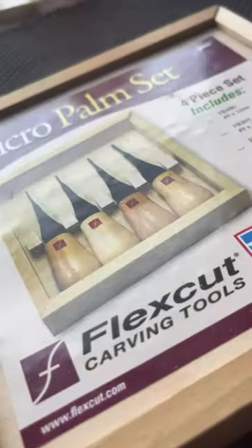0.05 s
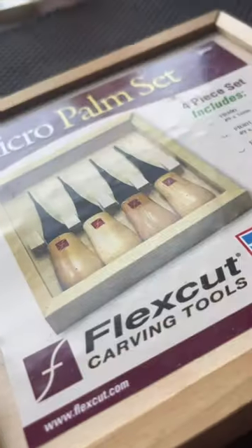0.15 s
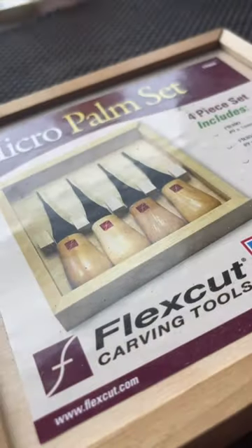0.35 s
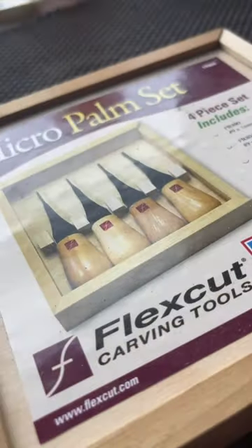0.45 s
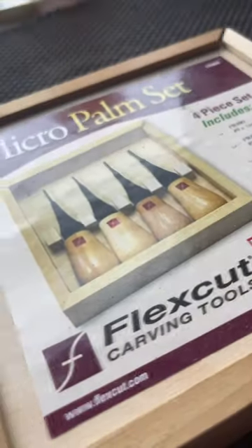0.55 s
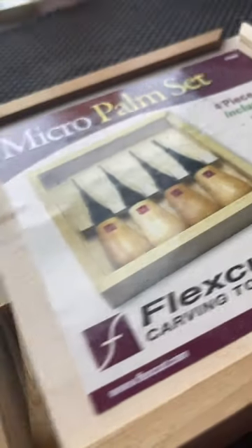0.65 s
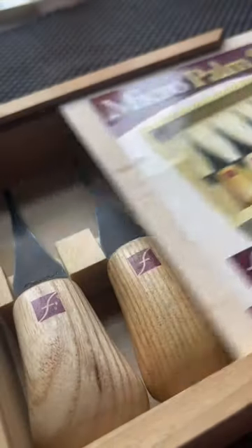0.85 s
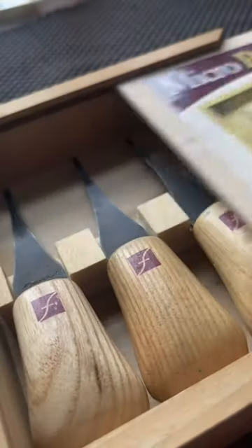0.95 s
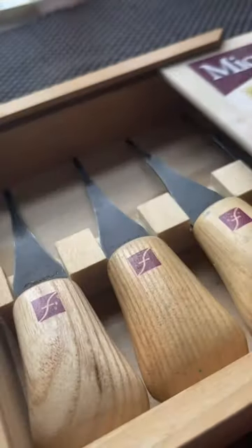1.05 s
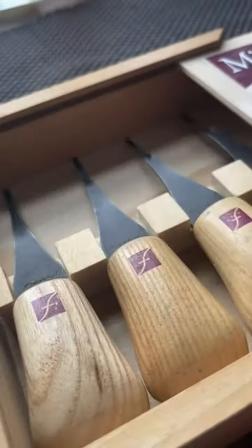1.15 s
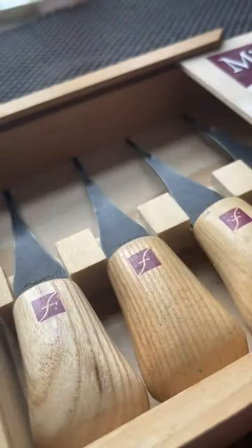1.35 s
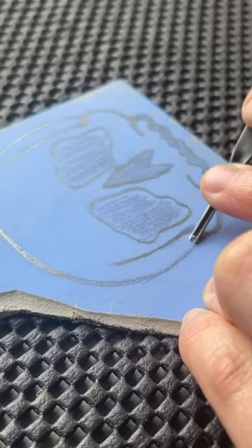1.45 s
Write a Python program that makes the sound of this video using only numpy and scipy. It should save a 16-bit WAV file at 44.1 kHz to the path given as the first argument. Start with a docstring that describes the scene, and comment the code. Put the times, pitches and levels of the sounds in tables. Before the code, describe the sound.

A wooden box lid knocks loose, then slides open with a dry scrape.

```python
"""The sliding lid of a small wooden tool box breaks free with a hard double knock, then scrapes out.
The knock rings box and blades and thumps the table; the carving tools settle with dull taps.
The long dry scrape is wood fibres catching and slipping, driving resonances of lid and cavity.
A faint creep comes before the knock, a light rub after the slide, handling rumble throughout.
Heard by a close microphone pair in a small room."""
import sys
import numpy as np
from scipy import signal
from scipy.fft import rfft, irfft
from scipy.io import wavfile

SR = 44100
rng = np.random.default_rng(int(sys.argv[2]) if len(sys.argv) > 2 else 0)


def generate_wav(sig):
    """Save sig (samples, or channels by samples) to the path in sys.argv[1] as 16-bit PCM at SR."""
    pcm = np.round(np.clip(np.atleast_2d(sig).T, -1, 1) * 32767).astype(np.int16)
    wavfile.write(sys.argv[1], SR, pcm)


N = 66150
T = np.arange(N) / SR
HZ = np.fft.rfftfreq(2 * N, 1 / SR)
MID_ONLY = np.array([[1], [0]])  # two-row signals are mid, side

# lid impacts: start_s, level_db, treble_db, bass_db
KNOCKS = [(0.2301, -20, -13.5, -8.5), (0.232, 3, -6, -17), (0.2337, 4, -6.5, -10),
          (0.2365, -2.5, -2.5, -2.5), (0.2405, -6.5, 14, 5.5), (0.2431, -3, 2, 0), (0.2453, -8.5, 4, -2),
          (0.2510, -9.5, -3.5, -2.5)]
# impact spectrum: freq_hz, level_db
KNOCK_SPECTRUM = [(40, -25.5), (110, -15), (200, -6.5), (305, 4.5), (370, -6), (450, -4.5), (520, -8.5),
                  (740, -16.5), (1010, 5.5), (1200, -5), (1400, -7), (2100, -6.5), (2700, -19.5),
                  (3200, -21.5), (3600, -19), (5000, -22.5), (5700, -23.5), (6300, -13.5), (7200, -24),
                  (10400, -24), (12500, -37.5), (15000, -61)]
# box and blade modes: pitch_hz, level_db, base_t60_s
BOX_MODES = [(286.8, -4.5, .22), (321.4, -4.5, .2), (406.5, -6, .22), (450, -6.5, 0.12), (490.6, -4, 0.19),
             (579, -6, 0.14), (650, -10.5, 0.13), (910, -8, 0.11), (1028, 0.5, .11), (1090, -4, .08),
             (1182, -10.5, .1), (1362, -6, .09), (1389, -3.5, 0.16), (1552, -7, 0.14), (1773, -7.5, .11),
             (1987, -11.5, .11), (2094, -6.5, 0.18), (2793, -18.5, 0.18), (3560, -16.5, 0.12),
             (6160, -16, 0.055)]
# box bumps on the table: start_s, level_db, pitch_hz, decay_s
THUMPS = [(0.2404, -2.5, 103, 0.0071), (0.288, -27, 115, .007), (0.3, -29, 83.7, 0.006),
          (0.601, -26.5, 135.6, 0.016), (1.016, -36, 189, 0.0095), (1.103, -38.5, 140, 0.016)]
# box and tools settling: start_s, level_db, high_cut_hz, low_cut_hz
TAPS = [(0.0229, -5, 980, 260), (0.1104, -15, 977, 350), (0.1714, -17, 938, 350), (0.2549, 3, 870, 200),
        (0.2600, -2, 1800, 200), (0.2672, 3, 2110, 790), (0.2706, 2.5, 1188, 200), (0.2766, 0.5, 1580, 254),
        (0.2821, 3, 1860, 400), (0.2879, 1.5, 1500, 200), (0.2937, -10, 1990, 740),
        (0.3064, -11.5, 1200, 300), (0.3243, -6.5, 690, 248.5), (0.332, -4.5, 554, 201),
        (0.3643, -10.5, 970, 250), (0.3718, -5.5, 2100, 397), (0.3735, -5.5, 720, 420),
        (0.4200, -5.5, 1160, 350), (0.4344, -1.5, 760, 350), (0.4408, -7.5, 420, 252),
        (0.451, -11, 450, 244.4), (0.4706, -14, 1000, 304), (0.4754, -6.5, 2100, 383),
        (0.4772, 0, 1005, 421), (0.488, -13, 510, 199), (0.5171, -9, 1140, 450), (0.5961, -10, 1130, 350),
        (0.599, -6.5, 650, 200)]
# board response: freq_hz, gain_db
BOARD_RESPONSE = [(200, -2), (285, 0), (360, -4.5), (570, 3.5), (790, -4.5), (950, 0.5), (1600, -2.5),
                  (2100, -0.5), (3000, -4), (3700, 1.5)]
# slide friction: time_s, level_db
SLIDE_ENVELOPE = [(.522, -67), (.548, -52), (.605, -41), (.68, -40), (.77, -34.5), (.86, -30), (.96, -33.5),
                  (1.05, -34.5), (1.12, -39.5), (1.165, -43.5), (1.195, -57), (1.225, -70), (1.29, -86.5)]
# slide friction: freq_hz, level_db
SLIDE_SPECTRUM = [(100, -21), (220, -5.5), (280, -20), (410, -3), (470, -14), (620, -4), (750, -9),
                  (1000, -3.5), (1140, -11), (1300, -5), (1650, -5.5), (2250, -9.5), (2900, -8),
                  (3900, -14), (4400, -10.5), (4900, -10), (5400, -13.5), (6150, -11), (6900, -9),
                  (8500, -9), (9700, -5.5), (11200, -1.5), (12300, -18), (14000, -40), (15500, -62)]
# lid and cavity modes: pitch_hz, half_width_hz, glide_hz_per_s, peak_s, level_db, swell_s, fade_s
SCRAPE_MODES = [(914, 47, 0, 0.013, -40.5, 0.026, 0.015), (600, 57, -250, 0.712, -34, 0.056, 0.045),
                (650, 76, 0.5, 0.82, -39, 0.035, 0.058), (902, 37, 0, 0.816, -41.5, 0.11, 0.02),
                (870, 55, 0, 0.886, -34.5, 0.045, 0.053), (891, 45, 130.5, 1.04, -45, 0.055, .09),
                (1500, 116, 300, .71, -41, 0.057, .06), (1522, 120, 198, 0.897, -38, 0.058, 0.076),
                (400, 34, 0, 0.807, -38.5, 0.015, 0.034), (2860, 240, -1, 1.2, -50, 0.3, 0.076),
                (1470, 1600, 2, 1.165, -46.5, 0.051, 0.028), (4370, 190, 0, 0.998, -50, 0.028, 0.033),
                (6070, 199.6, 0, 0.99, -44.5, 0.19, 0.076)]
# first creep: time_s, level_db
CREEP_ENVELOPE = [(0, -42.5), (0.023, -38), (0.074, -43), (.1, -47.5), (.125, -41.5), (.16, -52.5),
                  (.195, -44.5), (.215, -47), (.235, -37.5), (.26, -85.5)]
# first creep: freq_hz, level_db
CREEP_SPECTRUM = [(100, -12.5), (350, 2.5), (700, -16.5), (930, -0.5), (1300, -21.5), (2300, -25.5),
                  (3600, -21), (4600, -27.5), (5350, -17), (5800, -24), (6700, -15.5), (7300, -25),
                  (8200, -15.5), (9600, -11), (11000, -16.5), (12200, -29.5), (14000, -44.5)]
# last rub: time_s, level_db
RUB_ENVELOPE = [(1.3, -88), (1.335, -57.5), (1.37, -47.5), (1.42, -50.5), (1.5, -58)]
# last rub: freq_hz, level_db
RUB_SPECTRUM = [(300, -7.5), (700, -20), (950, -12.5), (1600, -20.5), (3500, -17), (5000, -15),
                (8000, -8.5), (10900, 1), (12200, -13), (14500, -32)]
# handling rumble: time_s, level_db
RUMBLE_ENVELOPE = [(0, -51), (.2, -47.5), (.3, -39), (.4, -49), (.5, -49), (.535, -53.5), (.63, -52.5),
                   (.85, -49.5), (1.03, -52), (1.2, -54), (1.29, -60), (1.5, -65)]
# handling rumble: freq_hz, level_db
RUMBLE_SPECTRUM = [(20, -35), (52, 2.5), (80, -2), (130, 1), (210, -5.5), (330, -6), (600, -24.5),
                   (2000, -51)]
# room decay: freq_hz, t60_s
ROOM_DECAY = [(100, .28), (500, 0.34), (4000, 0.34), (11000, 0.35)]
# microphone pair: freq_hz, left_lead_rad, coherence
MIC_PAIR = [(20, 0, .999), (600, 0, .95), (2200, .12, .96), (3900, .8, .7), (4600, 1.8, .7),
            (5000, 3.9, .65), (5650, 6.2, .97), (6250, 6.3, .97), (7200, 7.6, .75), (8100, 8.8, .8),
            (8600, 9.42, .999), (9350, 9.43, .999), (10200, 10.3, .87), (11500, 11.6, .82),
            (11900, 12.56, .995), (15000, 12.57, .995)]
# microphone balance: freq_hz, left_minus_right_db
MIC_BALANCE = [(60, 0), (150, -1.1), (500, -1.8), (1000, -1), (2000, -.2), (8000, 0)]
# brief level dip before the slide: time_s, gain_db
LEVEL_DIP = [(.521, 1), (.524, -21), (.545, 0)]

BASS_HZ, TREBLE_HZ = 650, 4240


def lid_knocks(impact_db=10, ring_db=-24.5, crunch_above_hz=650, crunch_decay_s=.0031):
    """Each knock is a push with a few ms of crunch above it, and sets the box ringing."""
    impacts, force = np.zeros((2, N)), np.zeros((2, N))
    spectrum_db = 20 * np.log10(unit_rms(amp(lookup(KNOCK_SPECTRUM))))
    highpass = 1 / np.sqrt(1 + (crunch_above_hz / (HZ + 1)) ** 2)
    for start_s, level_db, treble_db, bass_db in KNOCKS:
        crunch = filtered(noise(), highpass) * (T >= start_s) * np.exp(-abs(T - start_s) / crunch_decay_s)
        blow = crunch / np.linalg.norm(crunch[0]) + impulse(start_s) * MID_ONLY
        tilt_db = treble_db / (1 + (TREBLE_HZ / (HZ + 1)) ** 4) + bass_db / (1 + (HZ / BASS_HZ) ** 4)
        impacts += amp(level_db) * filtered(blow, minimum_phase(spectrum_db + tilt_db))
        force += amp(level_db) * impulse(start_s)
    return amp(impact_db) * impacts + amp(ring_db) * box_ring(force, damping=1.08)


def box_ring(force, damping):
    """Box and blade modes answer a force; damping multiplies their decay rate."""
    t = T[:SR // 2]
    modes = sum(amp(level_db - 60 * damping * t / t60_s)
                * np.sin(2 * np.pi * (pitch_hz * t + rng.random((2, 1))))
                for pitch_hz, level_db, t60_s in BOX_MODES)
    return signal.fftconvolve(force, modes, axes=1)[:, :N]


def table_thumps(rise_s=.00067, low_cut_hz=44):
    """The table top gives under the box in a few low swings."""
    swings = np.zeros(N)
    for start_s, level_db, pitch_hz, decay_s in THUMPS:
        t = np.maximum(T - start_s, 0)
        envelope = amp(level_db) * (1 - np.exp(-t / rise_s)) * np.exp(-t / decay_s)
        swings -= envelope * np.sin(2 * np.pi * pitch_hz * t)
    return filtered(swings, (1j * HZ / (1j * HZ + low_cut_hz)) ** 2) * MID_ONLY


def settling_taps(tap_db=-5.3, tick_db=-29, ring_db=-34, delay_at_1khz_s=.00205):
    """Soft contacts cross the boards as bending waves: treble first, bass later."""
    waves, force = np.zeros(N), np.zeros((2, N))
    dispersion = np.exp(-4j * np.pi * delay_at_1khz_s * np.sqrt(1000 * HZ))
    for start_s, level_db, high_cut_hz, low_cut_hz in TAPS:
        tick = amp(tick_db) / (1 + (HZ / (2 * high_cut_hz)) ** 4)
        contact = 1 / np.sqrt(1 + (HZ / high_cut_hz) ** 16) + tick
        band = unit_rms(contact / np.sqrt(1 + (low_cut_hz / (HZ + 1)) ** 4) / np.sqrt(1 + HZ / 700))
        waves += amp(level_db) * filtered(impulse(start_s - .001), band * dispersion)
        force += amp(level_db) * filtered(impulse(start_s), contact)
    boards = filtered(waves, minimum_phase(lookup(BOARD_RESPONSE))) * MID_ONLY
    return amp(tap_db) * boards + amp(ring_db) * box_ring(force, damping=2.1)  # hand on the lid


def lid_slide(thin_db_per_s=17, thin_below_hz=2890, mid_slide_s=.96):
    """Friction hiss that thins as the lid leaves its grooves."""
    hiss = unit_rms(filtered(friction(), amp(lookup(SLIDE_SPECTRUM))))
    lows = filtered(hiss, 1 / (1 + (HZ / thin_below_hz) ** 4))
    low_gain = amp(-thin_db_per_s * (T - mid_slide_s))
    return (hiss - lows + lows * low_gain) * gain_curve(SLIDE_ENVELOPE)


def scrape_resonances(waver_hz=22, pitch_waver=.02, waver_db=2.6, steadiness=.3):
    """Rubbed lid and cavity modes swell in turn; uneven hand pressure wavers pitch and level."""
    drive = friction()
    moving = np.minimum((gain_curve(SLIDE_ENVELOPE) + gain_curve(CREEP_ENVELOPE)) / amp(-47.5), 1)
    pressure = wander(waver_hz)
    tones = np.zeros((2, N))
    for pitch_hz, half_width_hz, glide_hz_per_s, peak_s, level_db, swell_s, fade_s in SCRAPE_MODES:
        track_hz = pitch_hz * (1 + pitch_waver * pressure) + glide_hz_per_s * (T - peak_s)
        carrier = np.exp(2j * np.pi * np.cumsum(track_hz) / SR)
        pole = np.exp(-2 * np.pi * half_width_hz / SR)
        swing = signal.lfilter([1], np.poly([pole, pole]), drive / carrier)
        swing /= (abs(swing) + 1e-9) ** steadiness  # rubbing evens out the swing
        envelope = moving * np.exp(-.5 * ((T - peak_s) / np.where(T < peak_s, swell_s, fade_s)) ** 2)
        tones += amp(level_db + waver_db * pressure) * unit_rms((carrier * swing).real) * envelope
    return tones


def friction(grains_per_s=3200, grain_spread_db=3.5, grain_share=.29,
             judder_db=.5, judder_hz=107, ripple_step_hz=110):
    """Wood fibres catch and slip: tiny clicks in a juddering hiss, coloured by the lid's upper modes."""
    grains = noise() * (rng.random(N) < grains_per_s / SR)
    grains *= amp(grain_spread_db * np.minimum(rng.exponential(1, N), 4))
    judder = amp(judder_db * wander(judder_hz))
    ripple = np.interp(HZ / ripple_step_hz, np.arange(SR // 20), rng.uniform(-1, 1, SR // 20))
    ripple_db = 7 * ripple * HZ / (HZ + BASS_HZ)
    hiss = np.sqrt(grain_share) * unit_rms(grains) + np.sqrt(1 - grain_share) * noise()
    return unit_rms(filtered(hiss * judder, amp(ripple_db)))


def light_rub(spectrum, envelope):
    """Faint friction of the barely moving lid."""
    return unit_rms(filtered(friction(), amp(lookup(spectrum)))) * gain_curve(envelope)


def room(sound, reflections_per_s=4000, gap_s=.004, treble_db=-2,
         notch_db=-8, notch_hz=6600, notch_width_hz=552):
    """Sparse reflections die band by band; the room tail is softer around 6.6 kHz."""
    length = SR // 2
    reflections = rng.standard_normal((2, length)) * (rng.random((2, length)) < reflections_per_s / SR)
    freq_hz, time_s, bands = signal.stft(reflections * (T[:length] > gap_s), SR, nperseg=256)
    decay = amp(-60 * time_s / lookup(ROOM_DECAY, freq_hz)[:, None])
    tail = signal.istft(bands * decay, SR, nperseg=256)[1]
    reverb = signal.fftconvolve(sound, tail / np.linalg.norm(tail[0]), axes=1)[:, :N]
    notch = np.exp(-((HZ - notch_hz) / notch_width_hz) ** 2)
    return filtered(reverb, amp(treble_db * HZ / (HZ + TREBLE_HZ) + notch_db * notch))


def background(floor_db=-76, floor_top_hz=8000):
    """Rumble of the handled box over a quiet noise floor."""
    floor = filtered(noise(), 1 / np.sqrt(HZ + 200) / (1 + (HZ / floor_top_hz) ** 6))
    rumble = filtered(noise(), amp(lookup(RUMBLE_SPECTRUM)))
    return unit_rms(rumble) * gain_curve(RUMBLE_ENVELOPE) + amp(floor_db) * unit_rms(floor)


def microphones(mid, side):
    """Mid, side to left, right: a close pair's coherence, phase and balance vary with frequency."""
    pair = np.array(MIC_PAIR)
    lead_rad, coherence = lookup(pair[:, :2]), lookup(pair[:, ::2])
    mid = filtered(mid, np.sqrt((1 + coherence) / 2))
    side = filtered(side, np.sqrt((1 - coherence) / 2))
    left_gain = np.exp(.5j * lead_rad) * amp(lookup(MIC_BALANCE) / 2)
    return np.array([filtered(mid + side, left_gain), filtered(mid - side, 1 / left_gain)])


def amp(db):
    """Decibels to gain."""
    return 10 ** (np.asarray(db) / 20)


def unit_rms(x):
    """Scales to rms 1."""
    return x / np.sqrt(np.mean(x ** 2) + 1e-20)


def lookup(table, at_hz=HZ):
    """Interpolates on a log-frequency axis."""
    freq_hz, value = np.transpose(table)
    return np.interp(np.log(at_hz + 1), np.log(freq_hz + 1), value)


def gain_curve(table):
    """Gain over time; zero beyond 10 ms outside the table."""
    time_s, level_db = np.transpose(table)
    return amp(np.interp(T, time_s, level_db)) * (T >= time_s[0] - .01) * (T <= time_s[-1] + .01)


def filtered(x, gain):
    """Applies a gain per frequency."""
    return irfft(rfft(x, 2 * N) * gain)[..., :N]


def minimum_phase(gain_db):
    """Response of a body that rings only after it is hit."""
    log_gain = np.log(amp(np.maximum(gain_db, -100)))
    mirrored = np.r_[log_gain, log_gain[-2:0:-1]]
    return np.exp(np.conj(signal.hilbert(mirrored)))[:N + 1]


def noise():
    """White noise, mid and side."""
    return rng.standard_normal((2, N))


def wander(cutoff_hz):
    """Low-passed noise, rms 1."""
    return unit_rms(filtered(rng.standard_normal(N), 1 / (1 + (HZ / cutoff_hz) ** 4)))


def impulse(time_s):
    """One unit sample."""
    return 1. * (np.arange(N) == round(time_s * SR))


def scene(knock_send_db=-17.5, tap_send_db=-16):
    """All sources in stereo; only knocks and taps feed the room."""
    knocks, taps = lid_knocks(), settling_taps()
    reverb = room(amp(knock_send_db) * knocks + amp(tap_send_db) * taps)
    scrape = lid_slide() + scrape_resonances()
    rubs = light_rub(CREEP_SPECTRUM, CREEP_ENVELOPE) + light_rub(RUB_SPECTRUM, RUB_ENVELOPE)
    mid, side = knocks + table_thumps() + taps + scrape + rubs + reverb + background()
    return microphones(mid, side)


def record(dry, knee=.95, band_limit_hz=15300):
    """Soft clip, brief level dip, low-pass."""
    rounded = dry / (1 + (dry / knee) ** 4) ** (1 / 4)
    dip = amp(np.interp(T, *np.transpose(LEVEL_DIP)))
    lowpass = signal.firwin(511, band_limit_hz, window=("kaiser", 9), fs=SR)
    return signal.oaconvolve(rounded * dip, lowpass[None], "same")


dry = scene()
out = record(dry)
generate_wav(out)
```